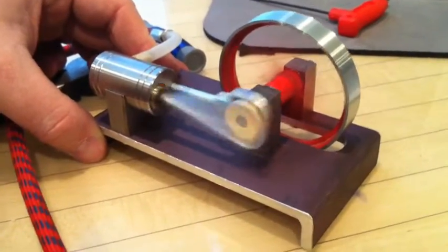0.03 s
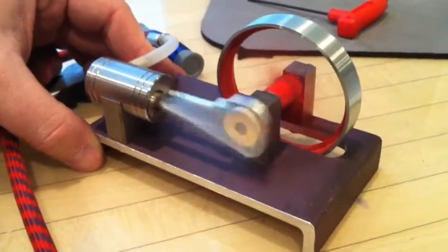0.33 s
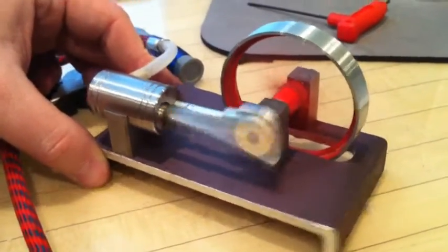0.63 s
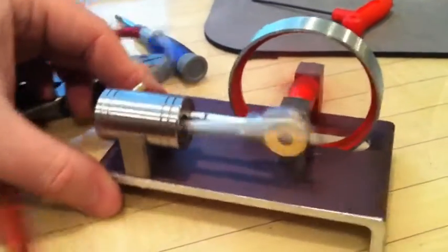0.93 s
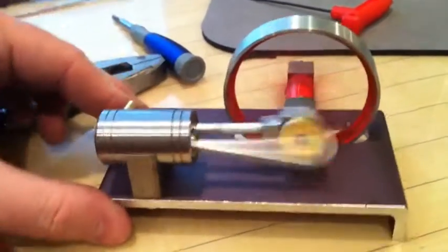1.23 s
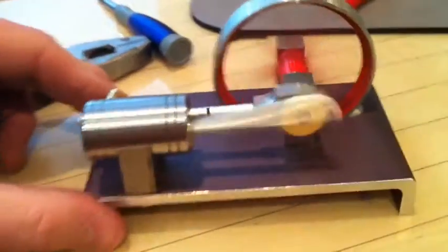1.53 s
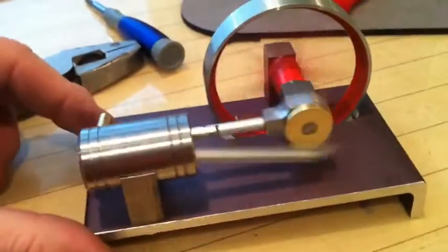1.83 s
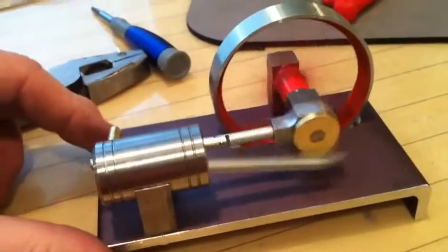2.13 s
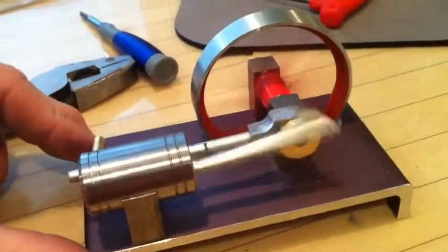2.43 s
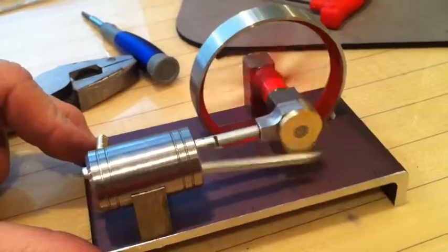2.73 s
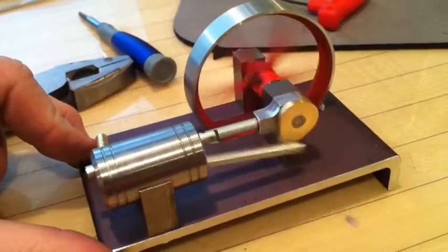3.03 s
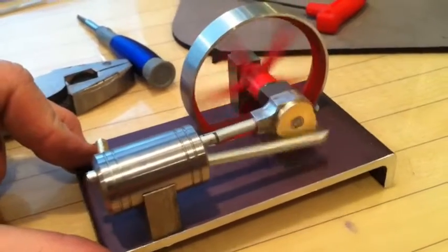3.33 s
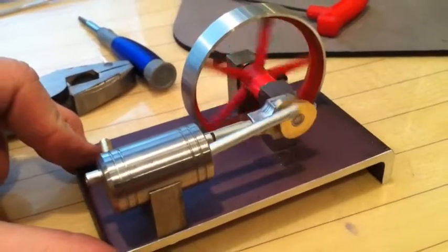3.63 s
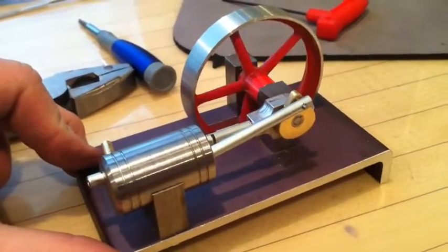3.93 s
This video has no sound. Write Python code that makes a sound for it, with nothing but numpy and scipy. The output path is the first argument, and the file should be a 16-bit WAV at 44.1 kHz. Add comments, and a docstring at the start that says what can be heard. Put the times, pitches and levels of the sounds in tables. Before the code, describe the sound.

Close up in a room, a little air-driven engine chuffs and knocks rapidly. After a brief spurt of air, the knocks grow slower and softer until they end, leaving an open hose hissing and a steady compressor drone.

```python
"""A compressor drones in the room and a hose hisses throughout. Close by, a small oscillating-cylinder
engine runs on the compressed air: each turn vents a whistling chuff, and play in the linkage knocks.
After a second the hose slips off with a spurt, and its open mouth rushes with a faint warble.
The flywheel coasts down, the knocks ever slower and softer, until only the air and the drone remain."""
import sys
import numpy as np
from scipy import signal
from scipy.fft import rfft, irfft, next_fast_len
from scipy.io import wavfile
from scipy.ndimage import uniform_filter1d, map_coordinates

SR = 44100
rng = np.random.default_rng(int(sys.argv[2]) if len(sys.argv) > 2 else 0)


def master(y):
    """Save y as 16-bit WAV."""
    cut = np.clip(np.atleast_2d(y).T, -1, 1)
    pcm = np.round(cut * 32767)  # scale
    wavfile.write(sys.argv[1], SR, pcm.astype(np.int16))


N = 176400


def amp(db):
    """Amplitude ratio of a level in decibels."""
    return 10 ** (np.asarray(db) / 20)


def unit(x):
    """Normalisation to rms 1."""
    return x / np.sqrt(np.mean(x ** 2) + 1e-20)


def clock():
    """Time of each sample in seconds."""
    return np.arange(N) / SR


def contour(points):
    """Linear interpolation of (time_s, value) points at each sample."""
    return np.interp(clock(), *np.transpose(points))


def along(points, hz):
    """Interpolation of (frequency_hz, value) points on a logarithmic frequency axis."""
    knots_hz, values = np.transpose(points)
    return np.interp(np.log(hz + 1), np.log(knots_hz + 1), values)


def wobble(rate_hz):
    """Smooth random modulation: a spline through rate_hz Gaussian values a second."""
    return map_coordinates(rng.standard_normal(N // 8), [clock() * rate_hz + 2], mode='wrap')


def filtered(x, response):
    """Linear filtering: the spectrum of x times a complex frequency response."""
    size = next_fast_len(N + SR // 2)
    return irfft(rfft(x, size) * response(np.fft.rfftfreq(size, 1 / SR)), size)[..., :N]


def noise(spectrum):
    """Coloured noise of rms 1, falling 12 dB an octave below the spectrum's first point."""
    def response(hz):
        return amp(along(spectrum, hz)) * np.minimum(hz / spectrum[0][0], 1) ** 2
    return unit(filtered(rng.standard_normal(N), response))


def turbulence(spectrum, depth_db=1.5):
    """Turbulent flow: noise of rms 1 whose gain varies in random patches over frequency and time."""
    bins = signal.stft(noise(spectrum), nperseg=1024)[2]
    patches = uniform_filter1d(rng.standard_normal(bins.shape), size=3, axis=0)
    patches = unit(uniform_filter1d(patches, size=14, axis=1))
    return unit(signal.istft(bins * amp(depth_db * patches), nperseg=1024)[1][:N])


def ring(x, modes):
    """Modal superposition: x drives damped resonances of alternating sign, at unit power gain."""
    def response(hz):
        body = sum((-1) ** k * amp(db) * 1j * hz * width / (centre ** 2 - hz ** 2 + 1j * hz * width)
                   for k, (centre, width, db) in enumerate(modes))
        return body / np.sqrt(np.mean(abs(body) ** 2))
    return filtered(x, response)


def compressor():
    """Periodic pumping: piston strokes give a harmonic drone; their load modulates hum and noise."""
    # harmonics of the stroke rate: order, relative_db
    harmonics = [(1, -51), (2, -44), (3, -32), (4, -22), (5, -16), (6, -8.5), (7, 0.5), (8, -2.5),
                 (9, -12.5), (10, -2), (11, -4.5), (12, -7.5), (13, -10.5), (14, -5), (15, -15), (16, -19),
                 (17, -28.5), (18, -21), (19, -38), (20, -44), (21, -29), (22, -15), (23, -36), (24, -4.5),
                 (25, -22), (26, -22.5), (27, -23), (28, -33), (29, -17.5), (30, -30), (31, -13.5),
                 (32, -19.5), (33, -26.5), (34, -17), (35, -19.5), (36, -15), (37, -16), (38, -12),
                 (39, -28), (40, -36), (41, -21), (42, -18), (43, -23), (44, -15)]
    # slow drift of the midrange: time_s, gain_db
    mids_drift = [(0, -1), (.9, 0.5), (1.4, -1.5), (2.5, -1), (4, 0)]
    # motor hum and its load sidebands: hum_order, offset_in_stroke_rates, level_db
    hum_lines = [(1, 0, -54), (1, 1, -54), (1, 2, -48.5), (1, 4, -58), (1, 5, -53.5), (1, 6, -58),
                 (1, 8, -55), (2, -1, -54), (2, 1, -51.5), (2, 2, -59)]
    # spectrum of the valve noise: frequency_hz, relative_db
    valve_spectrum = [(400, -25.5), (620, 3), (780, -2), (1050, 0), (1500, -4), (1900, -0.5), (2300, -18),
                      (4000, -10)]
    # spectrum of the rumble: frequency_hz, relative_db
    rumble_spectrum = [(25, -38), (60, -36), (95, -20), (125, -13.5), (160, -4), (210, -1), (280, -5),
                       (380, -6.5), (480, -15.5), (700, -13), (900, -22.5)]
    stroke_hz, hum_hz, mids_from_hz = 28.135, 120, 730
    first_stroke_s, load_lag_s = .0228, .0232
    waver_db, dispersion_rad = .6, 2.2
    t = clock()
    turn = 2 * np.pi * (stroke_hz * (t - first_stroke_s) + .003 * wobble(3.04))
    mids_db = contour(mids_drift)
    drone = np.zeros(N)
    for order, db in harmonics:
        gain = amp(db + waver_db * wobble(6.68) + mids_db * (order * stroke_hz > mids_from_hz))
        # the room disperses each stroke: phase grows with the square of the order
        drone += gain * np.cos(order * turn + dispersion_rad * order ** 2)
    load = turn - 2 * np.pi * stroke_hz * load_lag_s
    rumble = unit(amp(2.5 * np.cos(load)) * noise(rumble_spectrum))
    hum = sum(amp(db) * np.sqrt(2) * np.cos(2 * np.pi * order * hum_hz * t + offset * load)
              for order, offset, db in hum_lines)
    valves = unit(amp(1.5 * np.cos(load)) * noise(valve_spectrum))
    return amp(-34.5) * unit(drone) + hum + amp(-38 + mids_db) * valves + amp(-36.5) * rumble


def hose_hiss():
    """Flow noise: turbulence in the hose gives a continuous broadband hiss."""
    # spectrum of the hiss: frequency_hz, relative_db
    spectrum = [(1500, -7.5), (2000, -16), (2300, -6.5), (3100, -3.5), (4100, -9), (4600, -2.5), (5400, -2),
                (7300, 2), (8200, -2), (9100, 1), (10200, -3.5), (13000, -5), (14400, -10), (15800, -10.5)]
    return amp(-33.5 + .66 * wobble(20)) * turbulence(spectrum, depth_db=3.5)


def inlet_leak():
    """Jet noise: air leaks at the inlet and dies away once the hose is off."""
    # envelope of the leak: time_s, level_db
    envelope = [(0, -35.5), (.6, -33), (.95, -34), (1.1, -33), (1.195, -36.5), (1.25, -32), (1.3, -41),
                (1.45, -39), (2, -66.5)]
    # spectrum of the leak: frequency_hz, relative_db
    spectrum = [(1500, -23), (1900, 7.5), (2500, 0), (3150, 4.5), (4300, 0.5), (5400, 6.5), (6800, 1),
                (9000, 0.5), (11300, 2), (13000, -4.5), (15800, -5)]
    return amp(contour(envelope) + .62 * wobble(38.4)) * turbulence(spectrum)


def singing():
    """Resonance: narrow bands of noise come and go in the hiss of the inlet and hose."""
    # resonances: start_s, end_s, pitch_hz, width_hz, level_db
    resonances = [(-.5, .9, 12270, 240, -45), (1.65, 3.6, 7350, 1000, -42), (2.0, 4.8, 9250, 670, -50),
                  (3.4, 4.4, 9150, 440, -40), (3.1, 4.4, 11100, 550, -44.5), (1.7, 4.4, 15250, 600, -43.5)]
    fade_s = .35
    t, bands = clock(), np.zeros(N)
    for start, end, pitch, width, db in resonances:
        band = filtered(rng.standard_normal(N), lambda hz: 1 / (1 + ((hz - pitch) / width * 2) ** 2))
        fade = np.clip(np.minimum(t - start, end - t) / fade_s, 0, 1)
        bands += amp(db + wobble(6)) * fade * unit(band)
    return bands


def knocks():
    """Impact excitation: play in the linkage closes as the stroke reverses, ringing frame and cylinder."""
    # blows of the cylinder and rod: start_s, level_db, cylinder_relative_db
    blows = [(.001, -22.5, 0.5), (.063, -33, -8), (0.0757, -24, -2.5), (.151, -27.5, -1.5),
             (.226, -27.5, 2), (.304, -26.5, 4), (0.32, -26.5, -16), (0.38, -24, -1), (0.4542, -27, 5),
             (0.5304, -26, -8), (0.6072, -26.5, 2), (0.683, -25.5, -1), (.748, -30, -5), (0.837, -24.5, -3),
             (0.854, -34, -9), (0.918, -29, 1), (0.9926, -24, 3.5), (1.079, -28, 4), (1.1522, -20, -0.5),
             (1.239, -23.5, 4.5), (1.247, -30.5, -1.5), (1.332, -31, 5), (1.4299, -22.5, 4.5),
             (1.534, -30.5, 11), (1.645, -31, 10.5), (1.764, -31.5, 12.5), (1.89, -31.5, 8),
             (2.1508, -28.5, 5)]
    # modes of the frame: pitch_hz, width_hz, relative_db
    frame_modes = [(1830, 280, 3), (2400, 460, 3.5), (2946, 400, 4.5), (3620, 690, 0.5)]
    # modes of the cylinder: pitch_hz, width_hz, relative_db
    cylinder_modes = [(5220, 190, -4), (5620, 220, -2.5), (6360, 550, -14), (12000, 2300, -19.5)]
    oil_film_rise_s, contact_s, chatter_s, impact_lag_s = .00027, .0017, .0078, .0015
    impact_db, rattle_db, chatter_db = 13, -1.5, -11
    t = np.arange(SR // 10) / SR
    rise = 1 - np.exp(-t / oil_film_rise_s)
    decay = np.exp(-t / contact_s) + amp(chatter_db) * np.exp(-t / chatter_s)
    frame_force, cylinder_force = np.zeros((2, N + SR))
    for start_s, db, cylinder_db in blows:
        blow = amp(rattle_db) * rise * decay * rng.standard_normal(len(t))
        blow[round(impact_lag_s * SR)] += amp(impact_db)  # the hard impact follows the first touch
        start = round(start_s * SR)
        frame_force[start:start + len(t)] += amp(db) * blow
        cylinder_force[start:start + len(t)] += amp(db + cylinder_db) * blow
    return ring(frame_force[:N], frame_modes) + ring(cylinder_force[:N], cylinder_modes)


def whistle(pitch_hz, width_hz):
    """Edge tone of rms 1: random modulation widens a sinusoid into a breathy band."""
    phase = 2 * np.pi * np.cumsum(pitch_hz) / SR
    return unit(wobble(width_hz) * np.cos(phase) + wobble(width_hz) * np.sin(phase))


def chuffs():
    """Pulsed jet: the exhaust port opens once a turn; its hiss swells and its whistle rises with flow."""
    # exhaust pulses: centre_s, hiss_db, whistle_db, pitch_hz
    pulses = [(.066, -25.5, -25, 7900), (.141, -28, -25, 8100), (.216, -27, -25.5, 8190),
              (.291, -28.5, -24.5, 8150), (.366, -27.5, -26, 8050), (.442, -29, -23, 8070),
              (.517, -28, -28, 7940), (.596, -30, -26, 8000), (.673, -27.5, -24, 8100),
              (.749, -29, -18.5, 8150), (.827, -32, -22, 8030), (.902, -32.5, -24, 7825),
              (.981, -29, -23.5, 7700), (1.061, -29.5, -30, 7590)]
    # spectrum of the exhaust hiss: frequency_hz, relative_db
    spectrum = [(1500, -22), (2200, -11.5), (4000, -7), (6600, -5.5), (7400, -7.5), (9100, 3.5),
                (10500, 1.5), (11800, -1), (12300, 8), (12900, -2), (13700, -4), (15800, -6)]
    port_s, swell_s, whistle_s = .022, .006, .005  # half widths
    hiss_lag_s, port_edge_s, port_db, bend_hz = .0021, .0036, -2.5, 349.4
    t = clock()
    hiss_gain, whistle_gain = np.zeros((2, N))
    pitch = np.full(N, float(pulses[0][3]))
    for centre_s, hiss_db, whistle_db, pitch_hz in pulses:
        from_peak_s = t - centre_s - hiss_lag_s
        port = np.clip((port_s - abs(from_peak_s)) / port_edge_s + .5, 0, 1)
        swell = np.exp(-(from_peak_s / swell_s) ** 2 / 2)
        hiss_gain += amp(hiss_db) * port * np.hypot(amp(port_db), swell)
        progress = (t - centre_s) / whistle_s
        whistle_gain += amp(whistle_db) / (1 + progress ** 4 / 2)
        bend = 1 - np.exp(-np.clip(progress, -2.5, 1.5) / 2)
        pitch = np.where(progress > -6, pitch_hz + bend_hz * bend, pitch)  # resets between whistles
    breathy = unit(whistle(pitch, width_hz=260) + 1.2 * whistle(pitch, width_hz=1100))
    return hiss_gain * noise(spectrum) + amp(-1) * whistle_gain * breathy


def bumps():
    """Soft, deep bumps: a smooth Gaussian pulse holds only low frequencies."""
    # pressure pulses: centre_s, peak_db
    pulses = [(.08, -46), (.747, -44), (.812, -44), (.925, -45), (2.02, -51)]
    half_width_s = .0034
    return sum(amp(db) * np.exp(-((clock() - centre_s) / half_width_s) ** 2) for centre_s, db in pulses)


def hose_mouth():
    """Free jet: air rushes from the open mouth of the hose as it is moved away."""
    # envelope of the rush: time_s, level_db
    envelope = [(1.0, -69), (1.14, -34.5), (1.4, -35.5), (1.75, -34), (2.1, -37.5), (2.6, -38)]
    # spectrum of the rush: frequency_hz, relative_db
    spectrum = [(800, -3), (1300, 5.5), (1800, 1.5), (2300, -11), (3200, -1), (4100, -4.5), (4900, -2),
                (5700, 4), (6500, -2), (10000, -21), (12000, -0.5), (13200, -1), (14500, 2.5),
                (15800, -6.5)]
    return amp(contour(envelope)) * turbulence(spectrum)


def spurt():
    """Unsteady jet: air sputters through the gap as the hose slips off the inlet."""
    # spectrum of the spurt: frequency_hz, relative_db
    spectrum = [(1200, -6), (1900, -2), (2500, -13), (3100, 6), (4300, -4), (5400, 12), (6800, 3),
                (8000, 0), (9300, 9), (11300, 5), (13000, 10), (15800, -0.5)]
    start_s, end_s, edge_s = 1.07, 1.19, .02
    level_db, sputter_db = -32.5, 4
    t = clock()
    gate = np.clip(np.minimum(t - start_s, end_s - t) / edge_s, 0, 1)
    return gate * amp(level_db + sputter_db * wobble(120)) * turbulence(spectrum)


def warble():
    """Random frequency and amplitude modulation: a faint tone wavers in the escaping air."""
    # envelope of the tone: time_s, level_db
    envelope = [(1.2, -62), (1.9, -45), (2.7, -51), (3.1, -48.5), (4, -50.5)]
    centre_hz, swing_hz, rate_hz, flicker_db = 1035, 45, 28, 4.5
    pitch_hz = centre_hz + swing_hz * wobble(rate_hz)
    level_db = contour(envelope) + flicker_db * wobble(rate_hz)
    return amp(level_db) * unit(np.sin(2 * np.pi * np.cumsum(pitch_hz) / SR))


def room(x):
    """Reverberation: convolution with a short noise tail whose treble dies first."""
    # reverberation times: frequency_hz, t60_s
    decay_times = [(200, .3), (2000, 0.12), (12000, 0.064)]
    hz, t, bins = signal.stft(rng.standard_normal(SR // 2), SR, nperseg=256)
    decay = amp(-60 * t / along(decay_times, hz)[:, None])
    tail = signal.istft(bins * decay, SR, nperseg=256)[1]
    return signal.fftconvolve(x, tail / np.linalg.norm(tail))[:N]


def scene():
    """Superposition: engine, reverberation, air, bumps and compressor add, alike in both channels."""
    engine = chuffs() + knocks()
    reverberation = amp(-3.5) * room(engine)
    air = inlet_leak() + hose_mouth() + hose_hiss() + singing() + spurt() + warble()
    mono = engine + reverberation + air + bumps() + compressor()
    return np.array([mono, mono])


def record(dry):
    """Band limiting: an ideal low-pass filter removes the highest treble."""
    cutoff_hz = 15780
    return filtered(dry, lambda hz: hz < cutoff_hz)


dry = scene()
out = record(dry)
master(out)
```